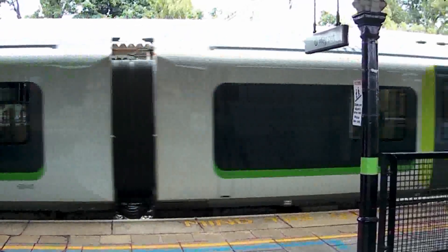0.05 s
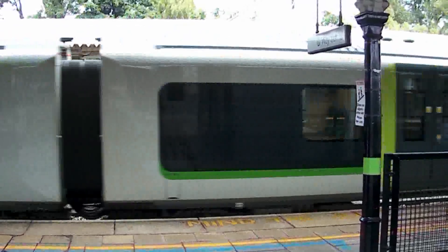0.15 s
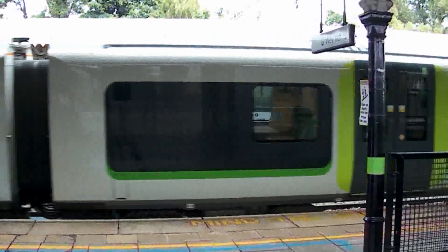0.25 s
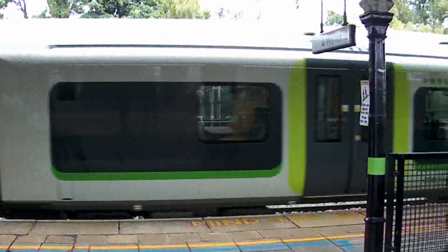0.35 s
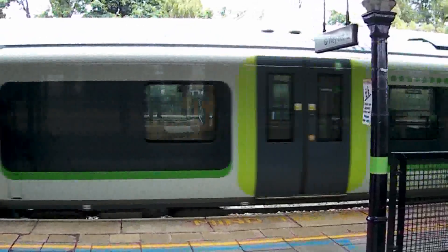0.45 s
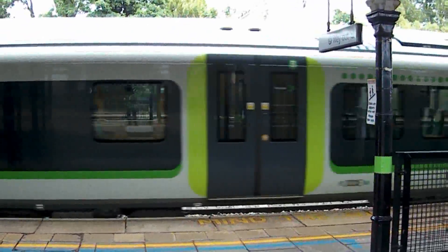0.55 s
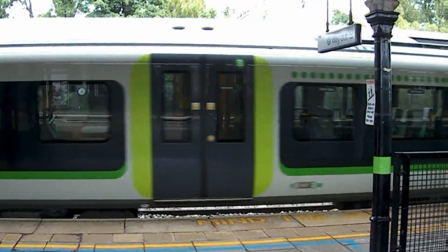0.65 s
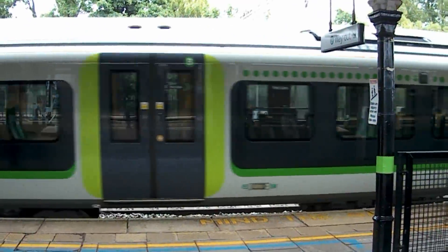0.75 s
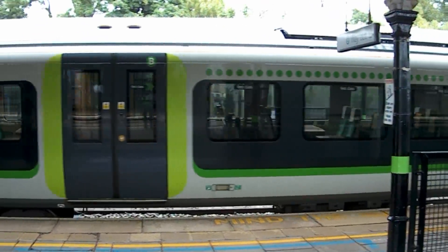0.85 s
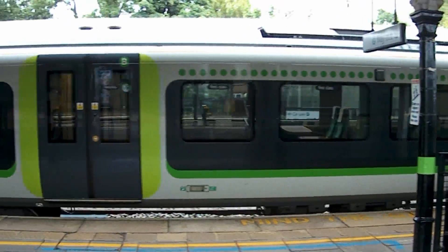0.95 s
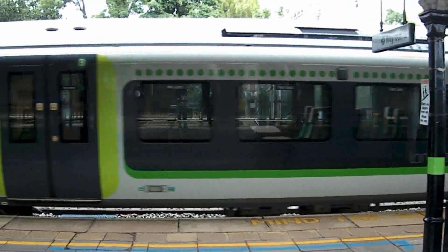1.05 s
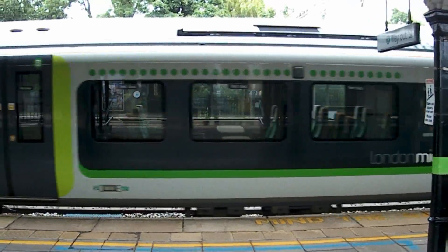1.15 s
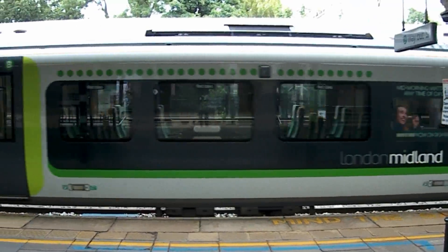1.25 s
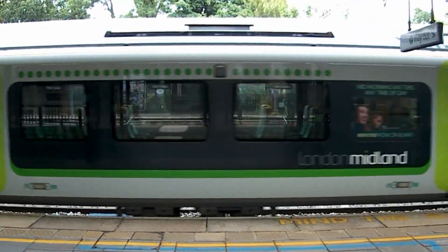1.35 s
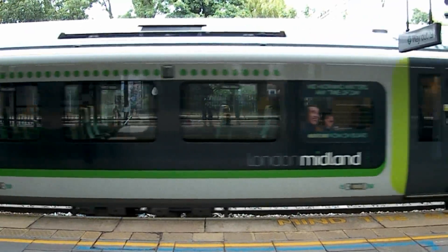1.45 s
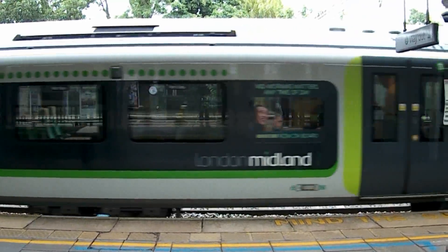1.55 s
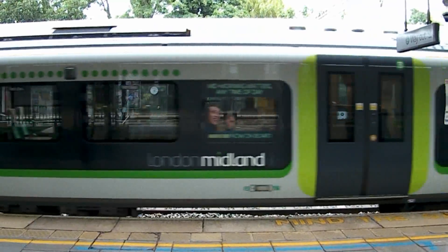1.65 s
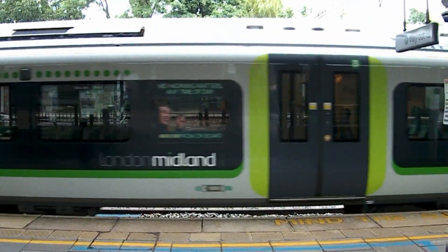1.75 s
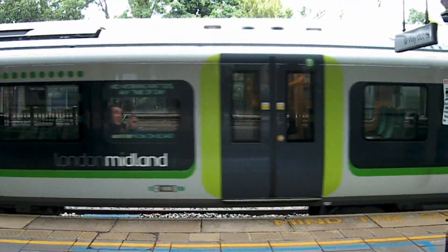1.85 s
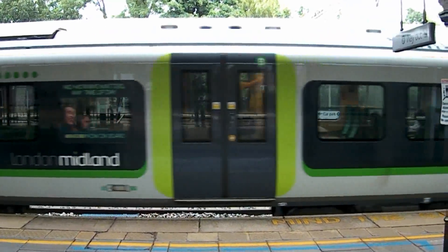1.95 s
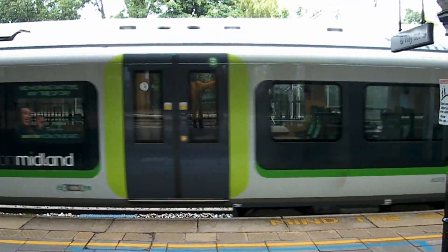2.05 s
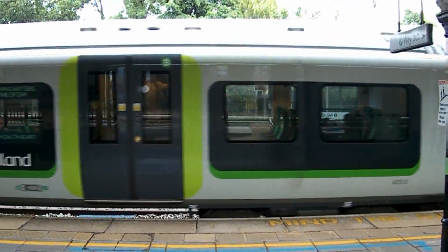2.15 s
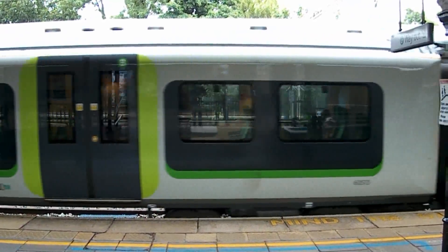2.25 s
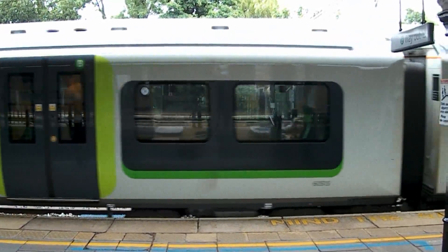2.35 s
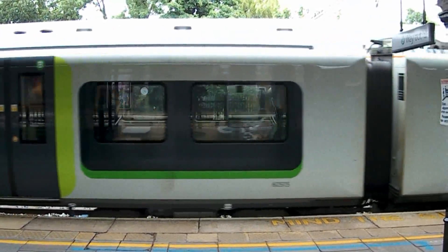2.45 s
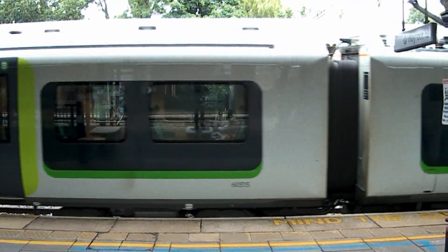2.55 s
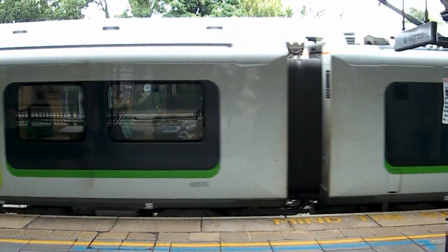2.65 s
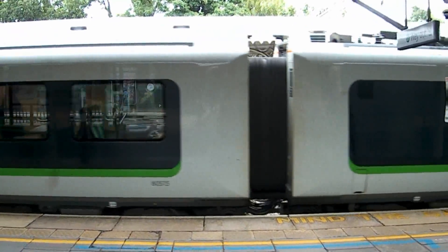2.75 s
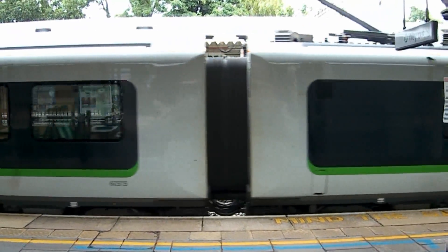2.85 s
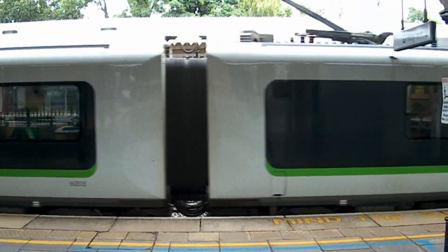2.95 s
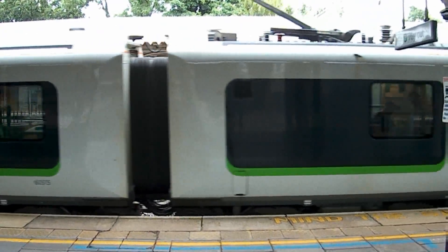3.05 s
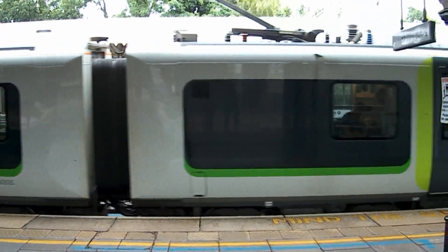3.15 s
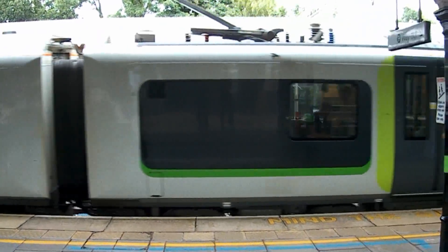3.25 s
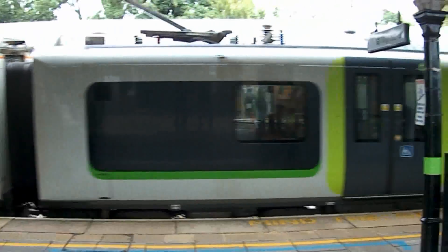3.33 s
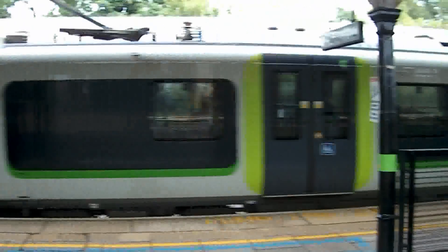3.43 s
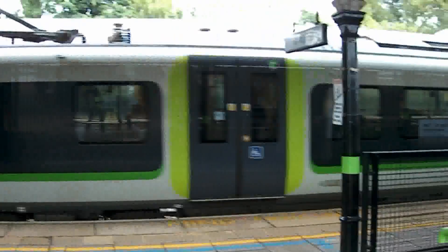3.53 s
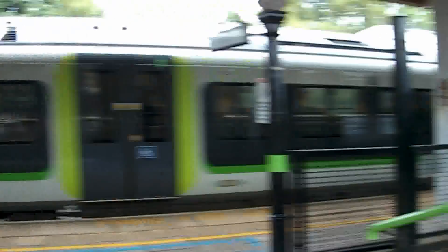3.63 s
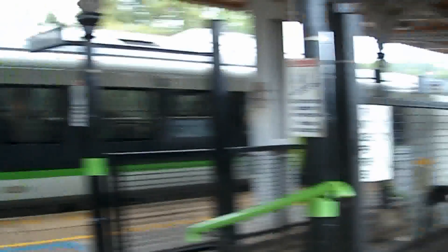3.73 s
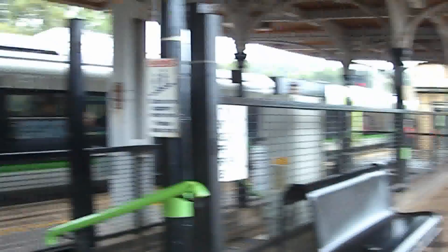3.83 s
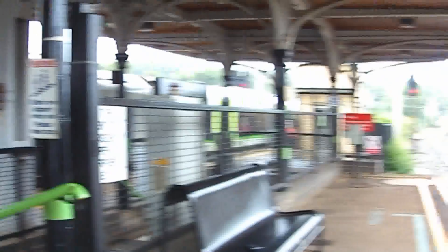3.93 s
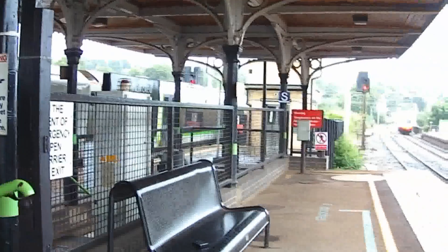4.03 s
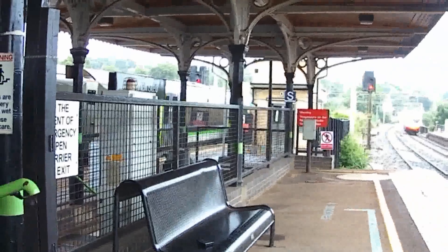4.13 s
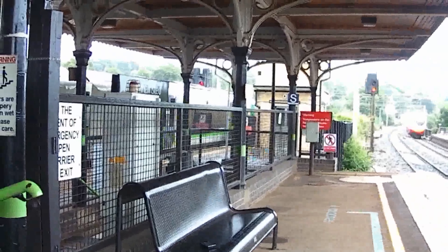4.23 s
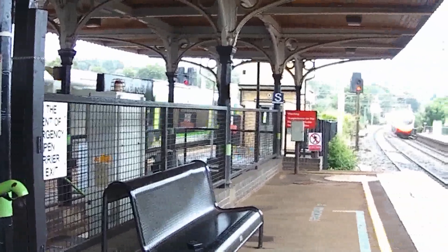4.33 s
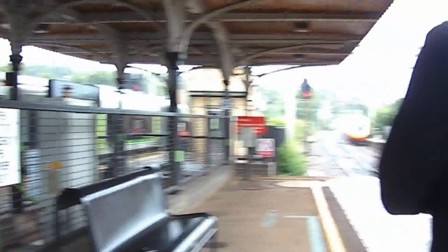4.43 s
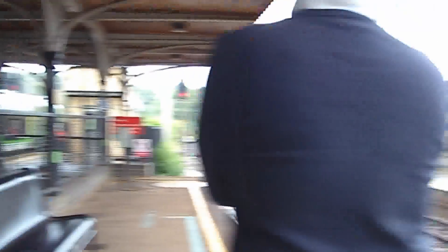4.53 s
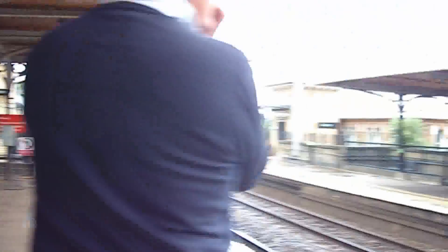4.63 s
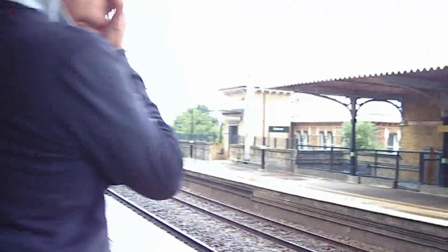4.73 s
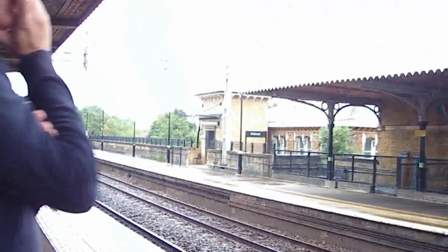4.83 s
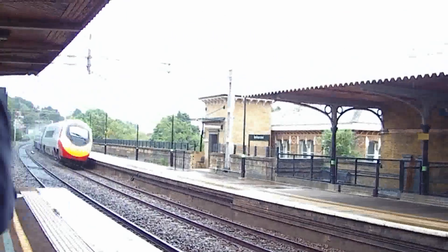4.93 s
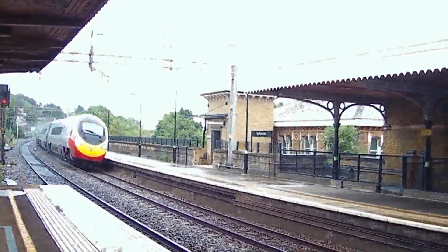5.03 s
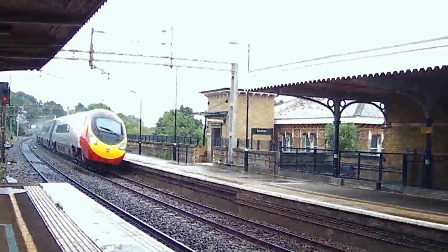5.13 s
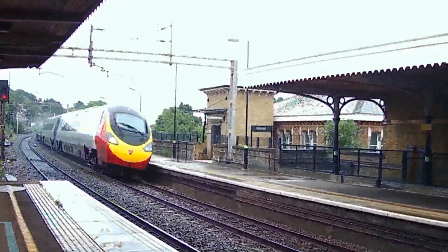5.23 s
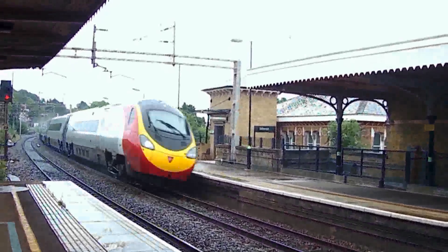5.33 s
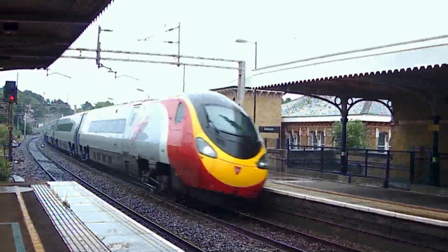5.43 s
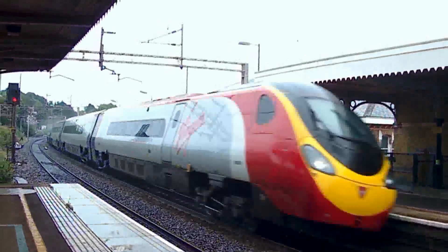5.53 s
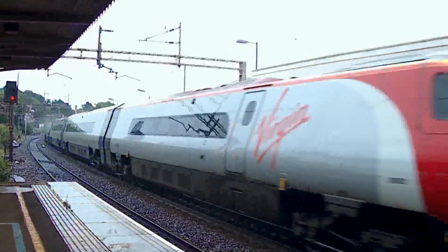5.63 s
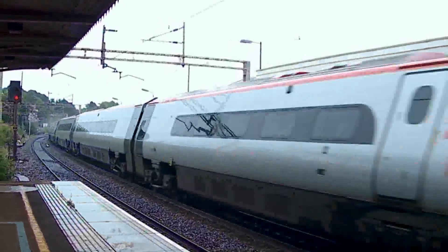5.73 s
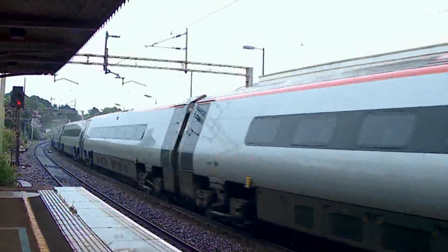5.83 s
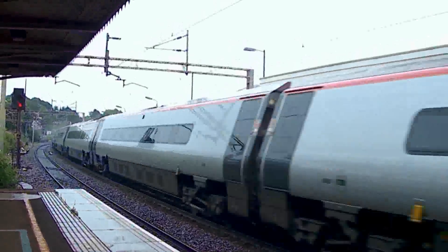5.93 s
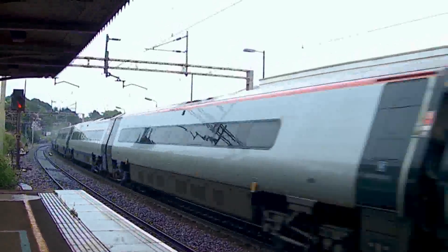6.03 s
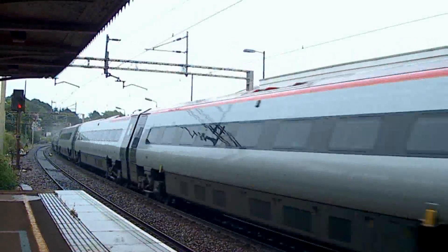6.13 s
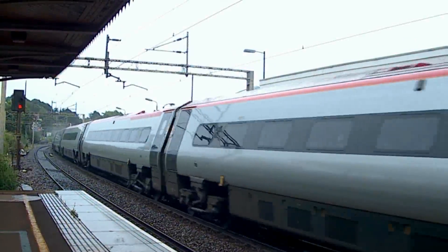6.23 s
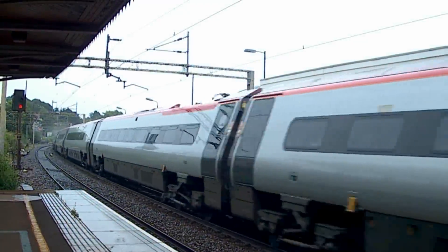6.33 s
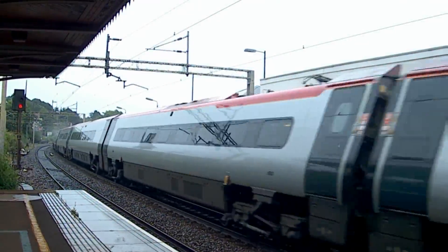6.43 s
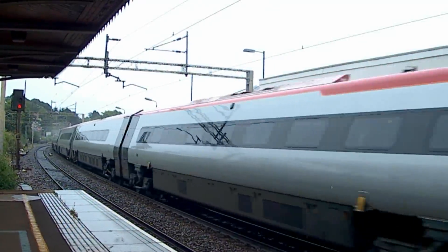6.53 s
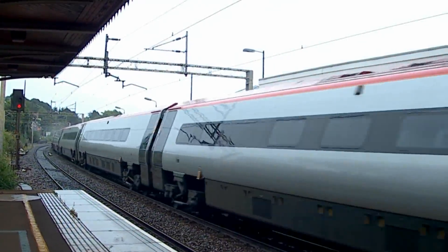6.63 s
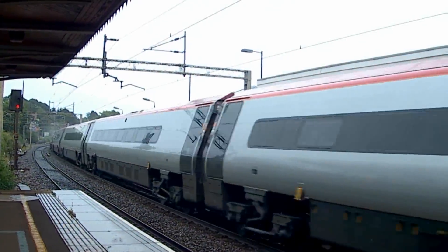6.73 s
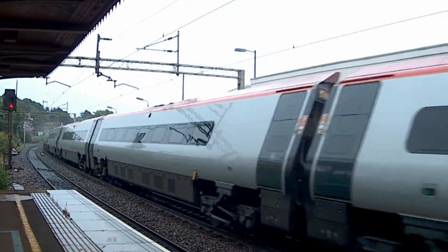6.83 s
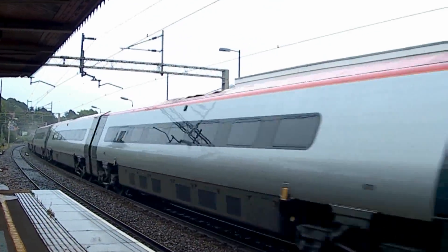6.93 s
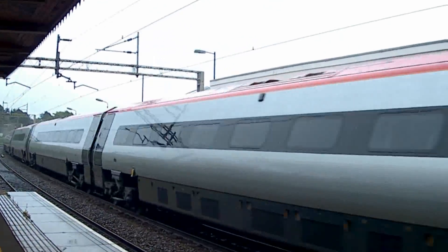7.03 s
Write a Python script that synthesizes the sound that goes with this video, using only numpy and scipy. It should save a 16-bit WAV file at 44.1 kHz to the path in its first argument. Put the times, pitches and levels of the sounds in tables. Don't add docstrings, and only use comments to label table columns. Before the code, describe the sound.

Wind flutters and thumps over a small, low-quality camera microphone at a platform edge. A passing electric train gives quiet rolling noise, hiss, underfloor hums, a faint high blower whistle and scattered clacks. Then steely rail ringing grows ahead of a fast train, whose sudden loud roar and rushing air distort the sound and continue to the end, pulsing as cars and wheels pass.

```python
import sys
import numpy as np
from scipy import signal
from scipy.fft import rfft, irfft, next_fast_len
from scipy.io import wavfile
from scipy.ndimage import uniform_filter1d, map_coordinates

SR = 44100
rng = np.random.default_rng(int(sys.argv[2]) if len(sys.argv) > 2 else 0)


def generate_wav(signal):
    frames = np.transpose(np.atleast_2d(signal))
    scaled = np.clip(frames, -1, 1) * 32767
    pcm = np.round(scaled).astype(np.int16)
    wavfile.write(sys.argv[1], SR, pcm)


def gain_from_db(level_db):
    decades = np.asarray(level_db, float) / 20
    return 10 ** decades


N = 312006

NOSE_S, NOSE_RISE_S = 5.551, 0.074
# [level alongside/dB, growth on approach/dB per s, jump at the nose/dB, drift alongside/dB per s]
BOOM_LAW = (-16.5, 16, 5.5, -0.5)
ROAR_LAW = (-12, 12, 4.5, .3)
RUSH_LAW = (-19.5, 18, 5.5, 3.5)
# [f/Hz, density/dB per Hz]
BOOM_COLOUR = [(90, -38), (140, -6), (180, 0), (260, -4), (340, -2.5), (430, -2.5), (560, -17), (900, -61)]
ROAR_COLOUR = [(280, -47.5), (420, -9.5), (530, -0.5), (780, -1.5), (950, 0.5), (1250, -6.5), (1500, -8),
               (1800, -8.5), (2340, -24), (3900, -120)]
RUSH_COLOUR = [(650, -24.5), (1100, -14.5), (1240, -9), (1490, -8), (1900, -3), (2430, -8), (3170, -12.5),
               (3530, -12.5), (3800, -14.5), (4940, -44.5), (8360, -120)]
# [t/s, half length/s, boom level/dB, roar level/dB, rush level/dB]
CARS = [
    (5.62, .14, 2, .5, 0),
    (6.3, .12, -2, -1.5, -1.5),
    (6.7, 0.066, 0, -1, -2.5),
]
# [t/s, half length/s, level/dB]
LULLS = [(5.864, .008, -4), (5.9, .005, -2), (6, .011, -2.5), (6.285, .01, -2), (6.378, .007, -2.5),
         (6.575, .005, -3), (6.64, .009, -3)]
# [f/Hz, width/Hz, level/dB]
BOUNCE_MODES = [(510, 22, -3), (533.5, 28, 0)]
FOOT_MODES = [(600, 29, -3), (636.4, 22, -0.5), (671, 17, 0.5), (735, 39, -1.5)]
SPAN_MODES = [(946, 53, -4.5), (995, 6.4, 0), (1056, 44, -1.5)]
WHEEL_MODES = [(880, 62, -2.5), (1860, 80, -1), (1973, 70, -4)]
# [full from t/s, full level/dB, growth before/dB per s, faintest level/dB]
RINGS = [
    (5.55, -23.5, 8.5, -40),
    (4.425, -27, 45, -41.5),
    (4.66, -25, 13.5, -44),
    (5.86, -18, 21.5, -50.5),
]
# [t/s, half length/s, rail foot level/dB, rail span level/dB, wheel level/dB]
AXLES = [(4.5, .1, 2, -3, -2), (4.75, 0.18, 1, 1.5, 0), (5.28, .2, -7, -0.5, -0.5), (5.62, .1, -1.5, -3, 0),
         (6.13, .12, 0.5, 7, 2), (6.5, 0.28, -1.5, 2, -0.5), (6.82, .14, 0, 9, -3.5),
         (7.07, .1, 5.5, 1, -2.5)]
# [loudest at t/s, length/s, f/Hz, level/dB]
RAIL_TONES = [(4.13, 0.71, 1006, -35.5), (4.8, 0.28, 1003, -29.5), (5.35, .2, 1002, -25.5),
              (6.16, .3, 1000, -17), (4.75, 0.76, 680, -32.5), (4.65, 0.49, 600, -32.5),
              (4.7, 0.34, 514, -33), (5.28, .45, 513, -27), (6.13, .25, 1836, -25)]

ROLL_DB, HISS_DB, HISS_SINKS_DB_PER_S, HISS_STEADY_S = -34, -36.5, 2.9, 2.23
LEAVE_S, LEAVE_DB_PER_S = 3.9, 3.1
# [f/Hz, density/dB per Hz]
ROLL_COLOUR = [(88, -38.5), (150, -5.5), (258, -3.5), (327, -10.5), (407, -9.5), (452, -11), (684, -8),
               (744, -8), (1350, -15), (1800, -19), (2340, -33), (3960, -120)]
HISS_COLOUR = [(650, -32.5), (1100, -7.5), (1350, -0.5), (1550, -7), (1860, -2), (2380, -9.5), (2840, -7),
               (3480, -12.5), (3800, -18), (4940, -51.5), (8360, -120)]
# [t/s, half length/s, rolling level/dB, hiss level/dB]
BOGIES = [
    (.25, 0.52, 4.5, .5),
    (2.25, .2, 1, 0),
    (3.4, .17, 3, 2),
]
# [t/s, level/dB]
BLOWER = [(0, -58), (2, -54.5), (3.2, -48.5), (4.8, -47.5), (5.4, -53.5)]
# [f/Hz, width/Hz, level/dB]
WHISTLE_MODES = [(3656, 230, 1.5), (3790, 420, -2)]
# [t/s, peak level/dB, body f/Hz, t60/s, dull share/0-1]
KNOCKS = [(.716, -14, 900, 0.046, 0.6), (2.082, -17, 1810, 0.026, 0.43), (2.191, -23, 427, 0.03, 0.24),
          (2.52, -19.5, 600, .04, 0.45), (3.209, -22, 2670, 0.04, 0.8), (3.245, -21, 730, 0.04, 0.35),
          (3.268, -18, 336, 0.12, 0.28), (3.379, -18.5, 905, 0.043, 0.6), (3.51, -19, 1145, 0.044, 0.63),
          (3.758, -18, 960, 0.044, 0.12), (3.785, -28, 1880, 0.038, 0.24), (3.982, -14, 990, 0.04, 0.8),
          (3.992, -13, 820, 0.075, 0.52), (4.003, -18.5, 1620, 0.046, 0.8), (4.276, -14.5, 996, 0.049, 0.2)]
# [loudest at t/s, passage/s, f/Hz, level/dB]
GEAR_HUMS = [(.1, .25, 203, -35), (.55, .3, 268, -38), (1.19, .4, 254, -38), (1.1, .4, 510, -43),
             (1.3, .3, 750, -44), (1.95, .4, 692, -43), (3.02, .36, 199, -34), (2.7, .2, 735, -44),
             (3.75, .4, 638, -40), (.4, .3, 1320, -45)]
# [loudest at t/s, length/s, f/Hz, level/dB]
GROANS = [(.34, 0.067, 272, -32), (.32, 0.13, 410, -38), (.62, 0.094, 268, -33), (.63, .1, 400, -39),
          (1.86, 0.11, 235, -33.5), (2.24, 0.077, 215, -35)]

# [t/s, level/dB]
WIND = [(0.0, -32), (0.1, -22.5), (0.12, -28), (1.4, -33), (1.73, -26), (2.05, -29), (2.11, -22),
        (3.01, -29.5), (3.44, -24), (3.56, -30), (4.37, -32), (5.42, -19.5), (5.57, -10.5), (6.24, -17.5),
        (6.95, -17.5), (7.07, -22)]
# [t/s, half length/s, deep level/dB, thump level/dB]
PUFFS = [(.08, 0.022, 7.5, 0.5), (.43, .03, -4, -6), (.75, .04, 1, 1), (1.87, 0.023, 5, 4),
         (2.13, .05, 1.5, -4), (2.4, 0.039, 4, -1), (2.68, 0.046, 7, 4.5), (2.85, .025, 3.5, 0.5),
         (3.25, 0.028, -5, 1.5), (3.33, 0.028, 4.5, -3), (3.42, 0.027, 3, 6), (4.75, 0.025, 11.5, 0.5),
         (5.19, .03, 9, 2), (5.6, 0.11, 1.5, 0), (5.77, .04, 2, 2.5), (5.95, .03, -7, 1),
         (6.12, .03, -3, 5), (6.67, .04, 2, 2.5), (6.79, .03, 6.5, 3.5), (6.93, 0.064, -17, 8.5)]
# [f/Hz, density/dB per Hz]
DEEP_COLOUR = [(8, -29.5), (16, -3), (27, -1.5), (45, -2.5), (65, -14), (110, -60)]
THUMP_COLOUR = [(30, -37), (50, -2), (75, 1.5), (120, -3.5), (200, -10), (300, -19), (500, -26),
                (800, -66.5)]
DEEP_DB, THUMP_DB = -3.5, -3

CAMERA_HZ = 8000
TOP, KNEE = 0.7, 8
FULL_SHARE = 0.2
# [f/Hz, gain/dB]
SMOOTHING = [(3500, 1), (3750, 1.5), (4000, -5.5), (4260, -13.5), (4400, -27), (4520, -43), (4650, -64),
             (4800, -100)]


def express():
    t = np.arange(N) / SR
    body_db = [nearing(*law) for law in (BOOM_LAW, ROAR_LAW, RUSH_LAW)]
    boom_db, roar_db, rush_db = body_db + swells(CARS)
    boom = gain_from_db(boom_db) * rush(BOOM_COLOUR, patchy_db=2.0)
    roar = gain_from_db(roar_db + 0.35 * wobble(25)) * rush(ROAR_COLOUR, patchy_db=1.0)
    air = gain_from_db(rush_db) * rush(RUSH_COLOUR, patchy_db=0.97)
    lull_db = sum(db * np.exp(-((t - s) / half) ** 4) for s, half, db in LULLS)
    fade_in = np.clip((t - 3.1) / 0.81, 0, 1)
    return fade_in * gain_from_db(lull_db) * (ringing_steel() + boom + roar + air)


def ringing_steel():
    t = np.arange(N) / SR
    ring_db = [np.clip(db + grows_db * (t - s), faint_db, db) for s, db, grows_db, faint_db in RINGS]
    ring_db = np.vstack([ring_db[0], ring_db[1:] + swells(AXLES)])
    parts = zip(ring_db, (BOUNCE_MODES, FOOT_MODES, SPAN_MODES, WHEEL_MODES))
    return sum(gain_from_db(db - 3.0) * singing(modes, swell_db=1.2, rate=7) for db, modes in parts)


def nearing(db, grows_db, jump_db, drift_db):
    since = np.arange(N) / SR - NOSE_S
    shaded = (1 - np.tanh(since / NOSE_RISE_S)) / 2
    return db + np.where(since < 0, grows_db, drift_db) * since - jump_db * shaded


def slow_train():
    t = np.arange(N) / SR
    roll_db, hiss_db = swells(BOGIES)
    hiss_db = hiss_db + HISS_DB - HISS_SINKS_DB_PER_S * np.minimum(t, HISS_STEADY_S)
    roll = gain_from_db(ROLL_DB + roll_db + 0.71 * wobble(25)) * rush(ROLL_COLOUR, patchy_db=0.26)
    hiss = gain_from_db(hiss_db + 0.39 * wobble(25)) * rush(HISS_COLOUR, patchy_db=-1.0)
    away = gain_from_db(-LEAVE_DB_PER_S * np.maximum(t - LEAVE_S, 0))
    blower = gain_from_db(curves(BLOWER)[0] - 1.0) * singing(WHISTLE_MODES, swell_db=1.0, rate=10)
    return away * (roll + hiss) + blower


def knocks():
    out, t = np.zeros(N + SR), np.arange(SR // 8) / SR
    for s, db, hz, t60, dull in KNOCKS:
        burst = uniform_filter1d(rng.standard_normal(len(t)), size=15) * 2.64
        ring = np.sin(2 * np.pi * hz * t) + 0.5 * np.sin(2 * np.pi * 0.87 * hz * t)
        envelope = gain_from_db(db - 60 * t / t60) * (1 - np.exp(-t / 0.00043))
        out[round(s * SR):][:len(t)] += envelope * ((1 - dull) * ring + dull * burst)
    return out[:N]


def hums(rows, sink, drift):
    t, out = np.arange(N) / SR, np.zeros(N)
    for s, length, hz, db in rows:
        pitch = hz * (1 - sink * np.tanh((t - s) / length) + drift * wobble(30))
        near = np.exp(-(2 * (t - s) / length) ** 4)
        tone = np.sin(2 * np.pi * np.cumsum(pitch) / SR)
        out += gain_from_db(db + 2 + 2.5 * wobble(18)) * near * tone
    return out


def wind():
    deep_db, thump_db = curves(WIND)[0] + swells(PUFFS)
    heave = rush(DEEP_COLOUR, patchy_db=0.2)
    thumps = unit(gain_from_db(2.26 * wobble(22)) * rush(THUMP_COLOUR, patchy_db=0.5))
    return gain_from_db(deep_db + DEEP_DB) * heave + gain_from_db(thump_db + THUMP_DB) * thumps


def rush(colour, patchy_db):
    z = signal.stft(rng.standard_normal(N + 1024), nperseg=1024)[2]
    field = uniform_filter1d(rng.standard_normal(z.shape), size=5, axis=0)
    field = uniform_filter1d(field, size=5, axis=1)
    noise = signal.istft(z * gain_from_db(patchy_db * unit(field)), nperseg=1024)[1][:N]
    return unit(filtered(noise, lambda hz: gain_from_db(along(colour, hz))))


def singing(modes, swell_db, rate):
    out = np.zeros(N)
    for centre, width, db in modes:
        noise = rng.standard_normal(N)
        ring = unit(filtered(noise, lambda hz: 1 / (1 + (2 * (hz - centre) / width) ** 2)))
        out += gain_from_db(db + swell_db * wobble(rate)) * ring
    return unit(out)


def swells(rows):
    t = np.arange(N) / SR
    return sum(np.outer(db, np.exp(-((t - s) / half) ** 2)) for s, half, *db in rows)


def curves(rows):
    s, *cols = np.transpose(rows)
    return [np.interp(np.arange(N) / SR, s, c) for c in cols]


def wobble(rate):
    coarse = np.arange(0, N + 32, 32)
    knots = rng.standard_normal(int(N * rate / SR) + 4)
    smooth = map_coordinates(knots, [coarse * rate / SR])
    return np.interp(np.arange(N), coarse, smooth)


def along(points, hz):
    f, v = np.transpose(points)
    return np.interp(np.log(hz + 1), np.log(f + 1), v)


def filtered(x, response):
    m = next_fast_len(N + SR // 2)
    return irfft(rfft(x, m) * response(np.fft.rfftfreq(m, 1 / SR)), m)[..., :N]


def unit(x):
    return x / np.sqrt(np.mean(x ** 2) + 1e-20)


def scene():
    fast_line = express() + hums(RAIL_TONES, sink=0.002, drift=0.004)
    gear = hums(GEAR_HUMS, sink=0.012, drift=0.0066) + hums(GROANS, sink=0.00996, drift=0.01)
    return (fast_line + slow_train() + knocks() + gear + wind())[None]


def thrifty(x, keep_upper, faint_db):
    hz, t, z = signal.stft(x, SR, nperseg=1536)
    chance = np.repeat(rng.random(len(t)), 3)[:len(t)]
    edge = np.where(chance < keep_upper, 3835, 3725)
    edge = np.where(chance < FULL_SHARE, CAMERA_HZ / 2, edge)
    power = np.abs(z[0]) ** 2
    bands = np.repeat(power[:-1].reshape(256, 3, -1).mean(axis=1), 3, axis=0)
    bands = np.vstack([bands, bands[:1]])
    usual = uniform_filter1d(power[(hz > 1500) & (hz < 3800)].mean(axis=0), size=15)
    heard = bands > usual * gain_from_db(2 * along(faint_db, hz))[:, None]
    return signal.istft(z * ((hz[:, None] < edge) & heard), SR, nperseg=1536)[1][..., :N]


def top_cut(x):
    return signal.sosfilt(signal.butter(12, 15800, fs=SR, output="sos"), x)


def record(dry):
    hot = dry / (1 + np.abs(dry / TOP) ** KNEE) ** (1 / KNEE)
    narrow = thrifty(hot, keep_upper=0.68, faint_db=[(2000, -30), (2900, -15), (3450, -11), (3600, -30)])
    mirrored = narrow * (1 + 2 * np.cos(2 * np.pi * CAMERA_HZ * np.arange(N) / SR))
    smooth = filtered(mirrored, lambda hz: gain_from_db(along(SMOOTHING, hz)) * (hz < 4800))
    clipped = np.clip(smooth, -0.708, 0.708)
    return top_cut(clipped)


dry = scene()
out = record(dry)
generate_wav(out)
```